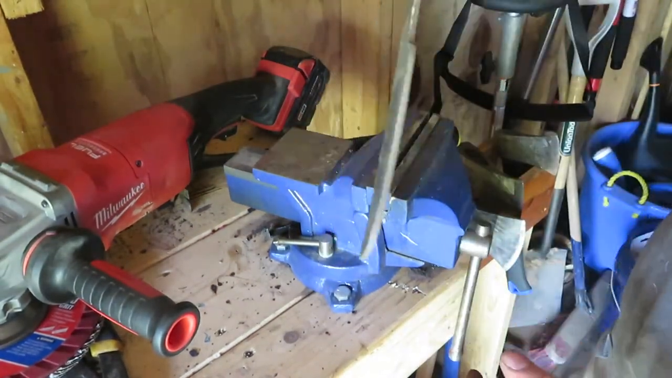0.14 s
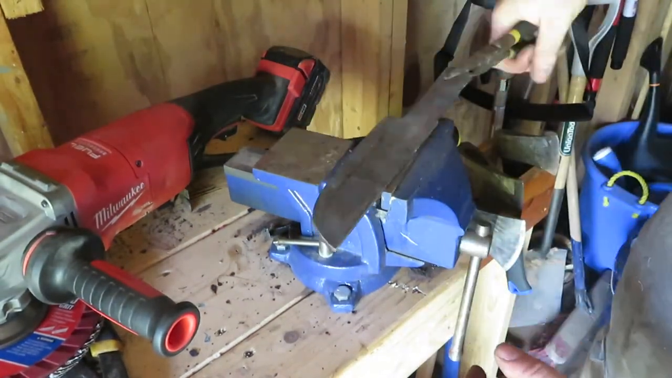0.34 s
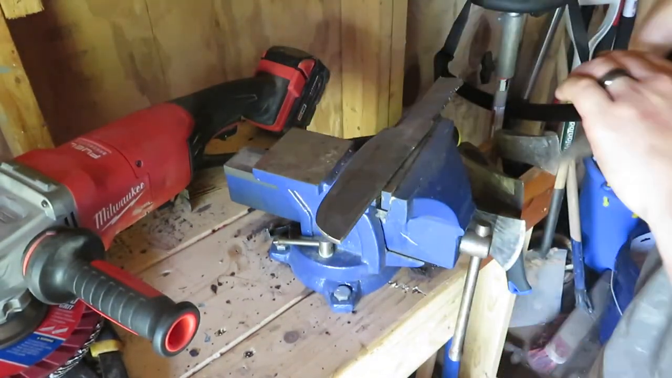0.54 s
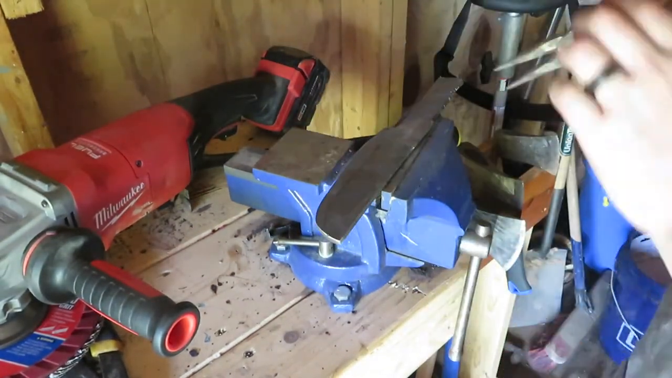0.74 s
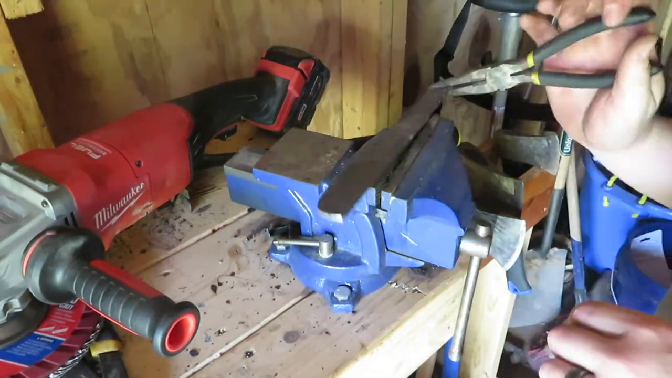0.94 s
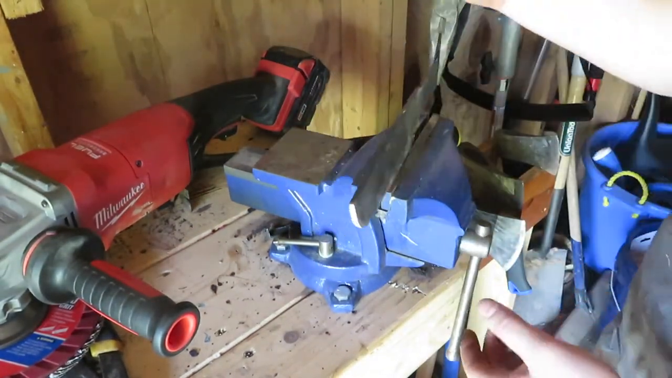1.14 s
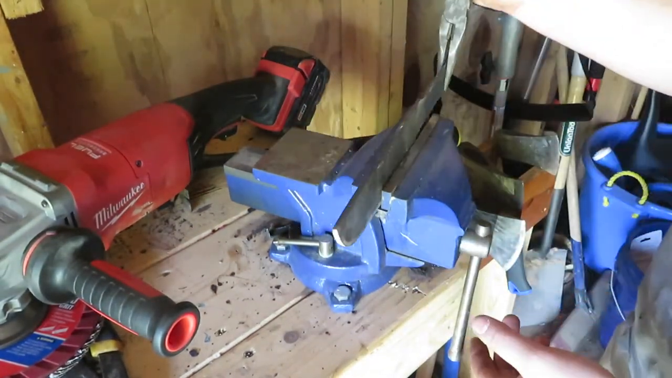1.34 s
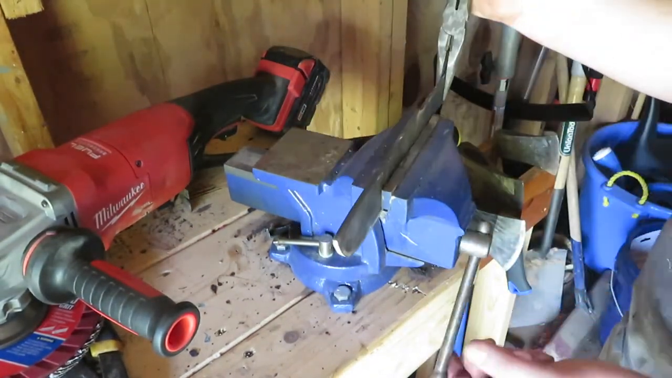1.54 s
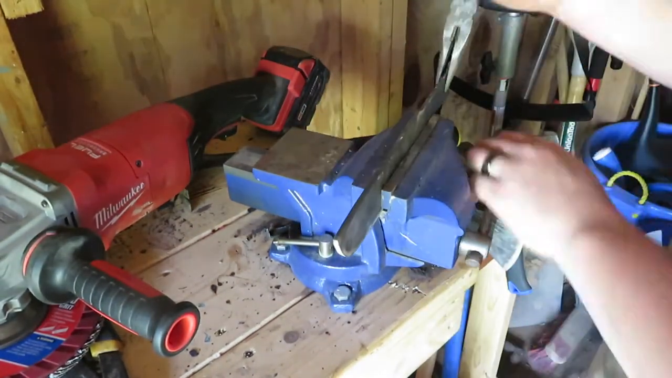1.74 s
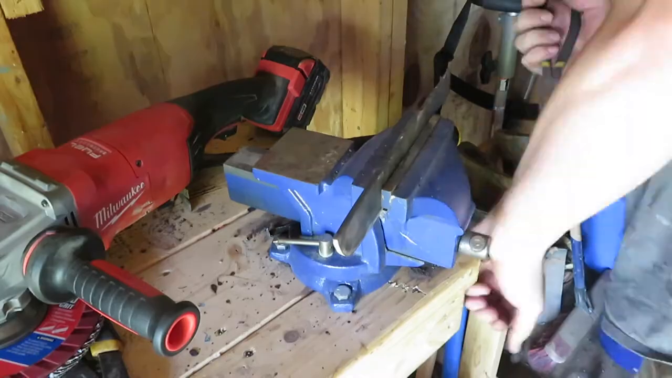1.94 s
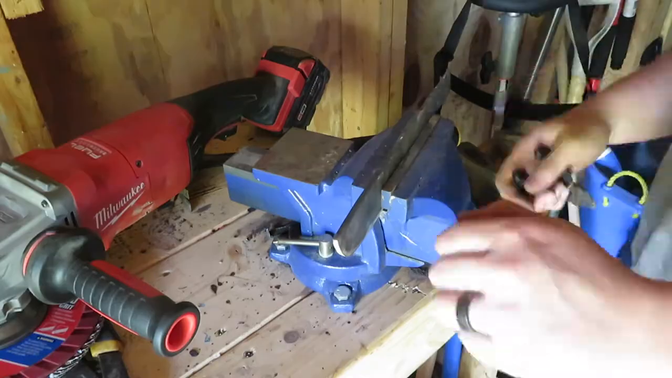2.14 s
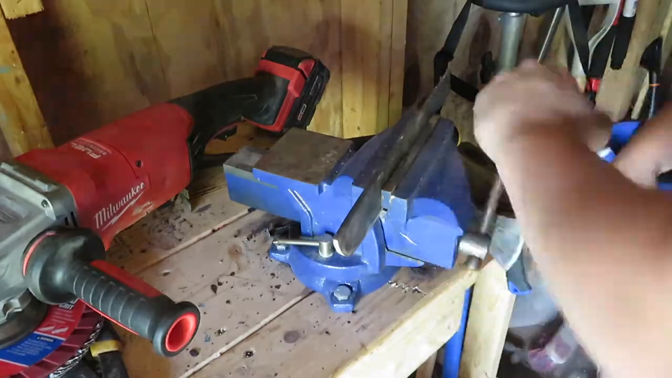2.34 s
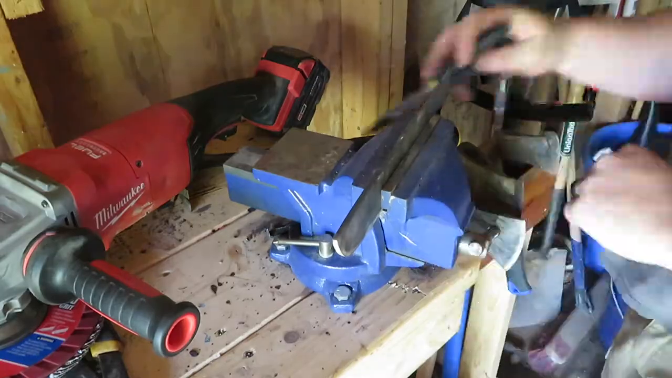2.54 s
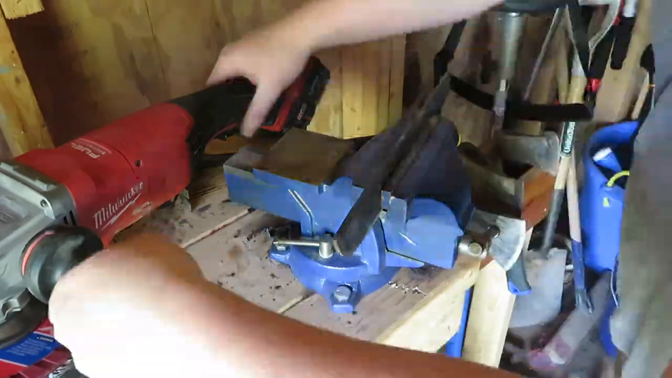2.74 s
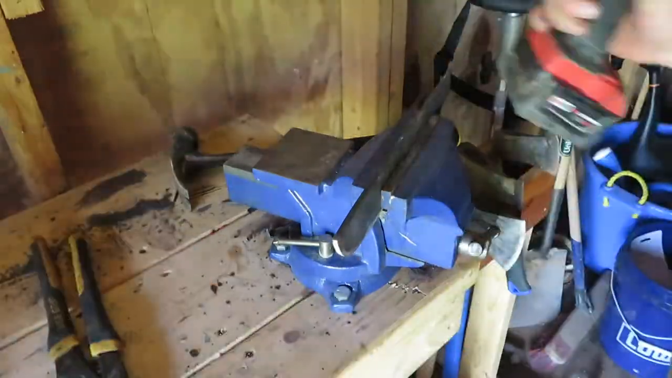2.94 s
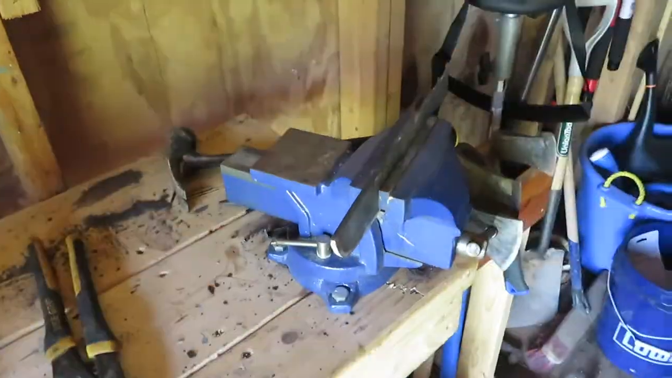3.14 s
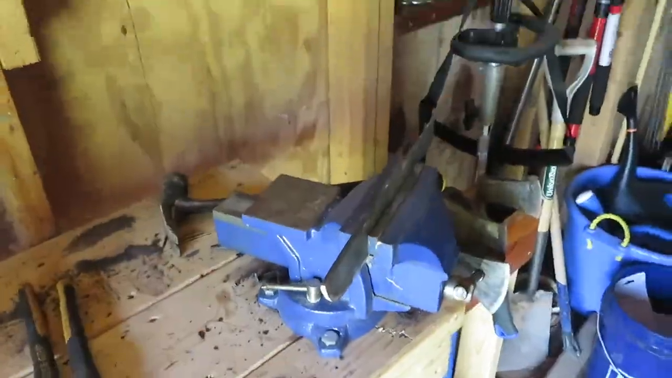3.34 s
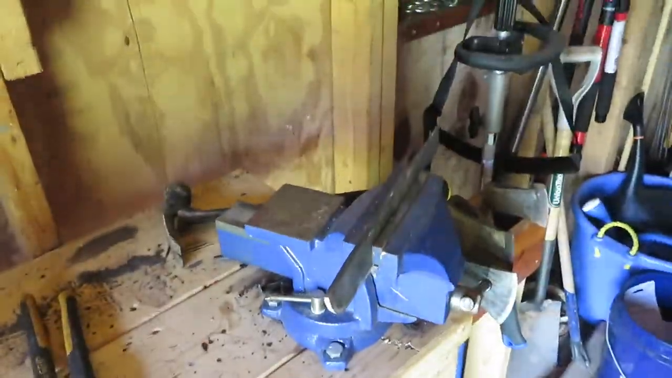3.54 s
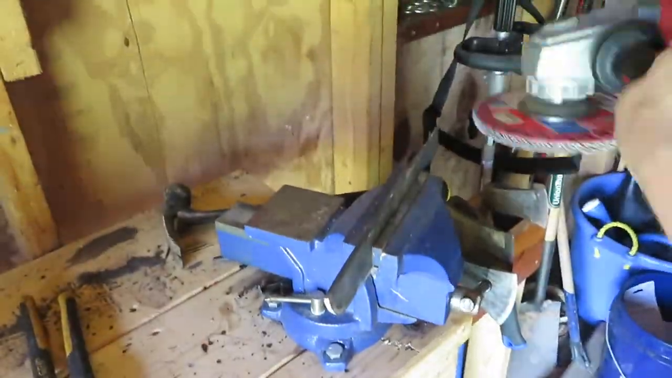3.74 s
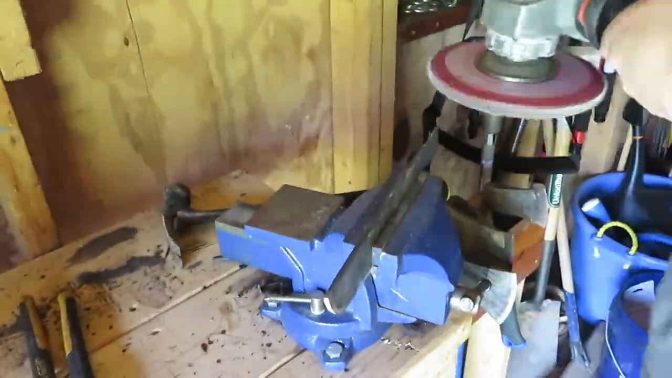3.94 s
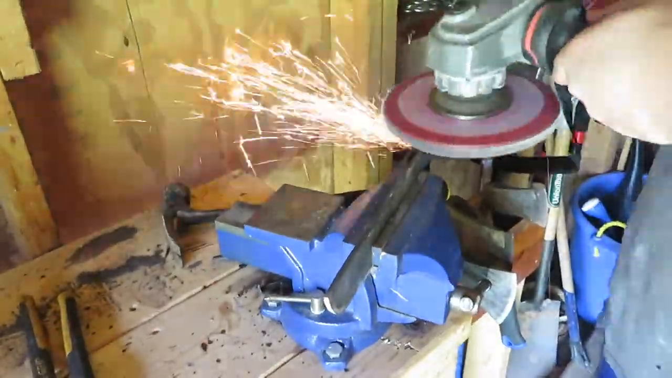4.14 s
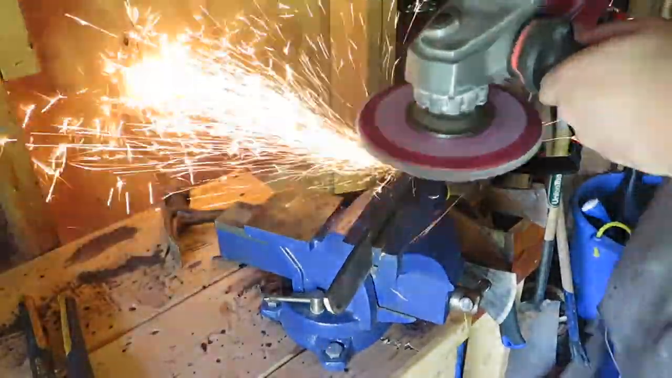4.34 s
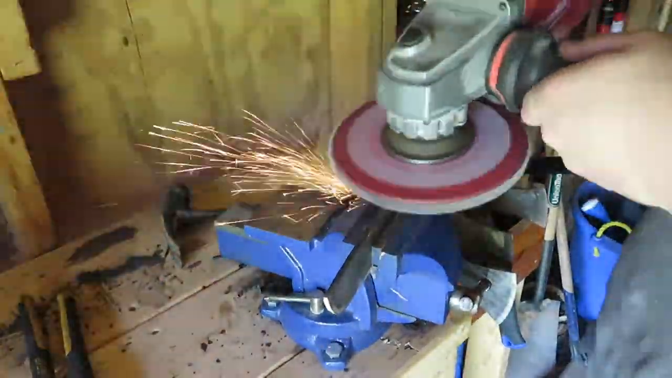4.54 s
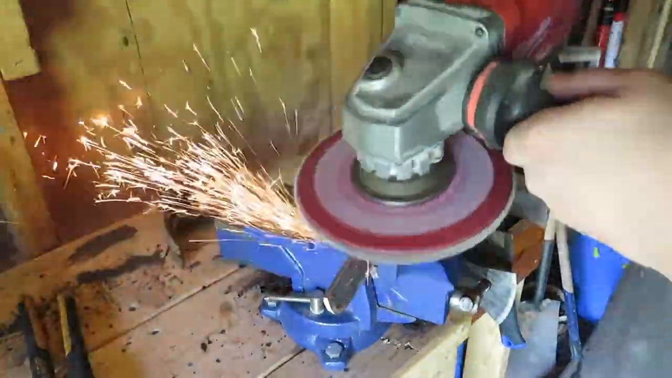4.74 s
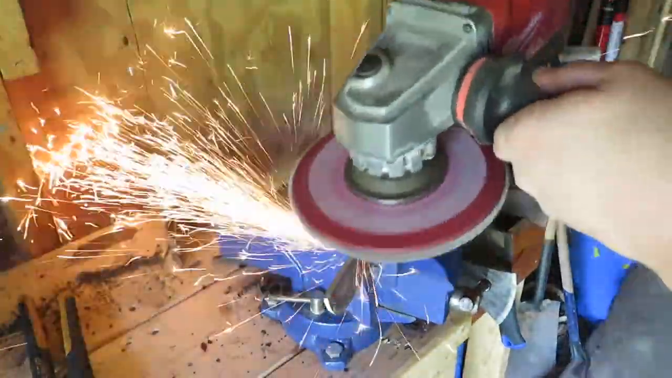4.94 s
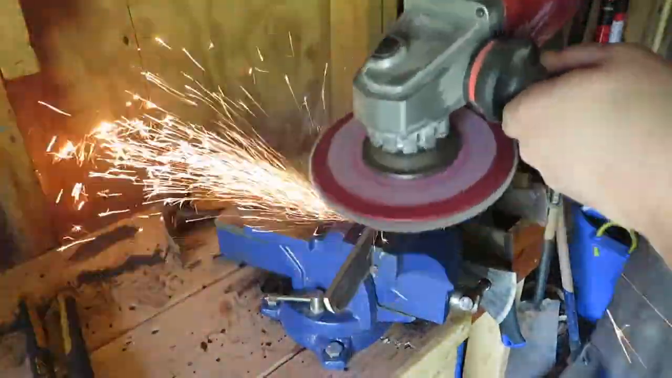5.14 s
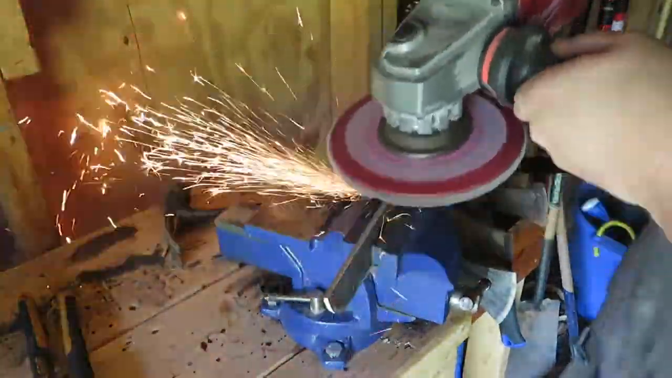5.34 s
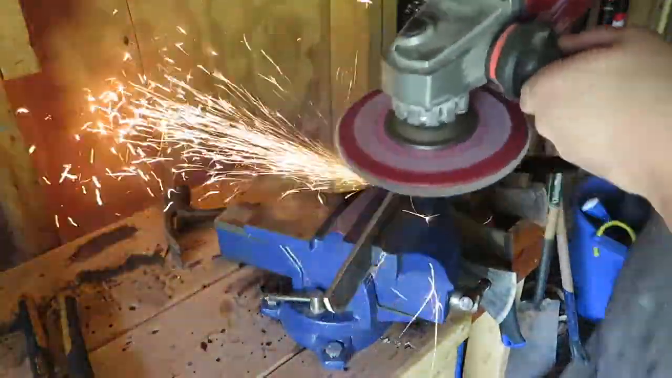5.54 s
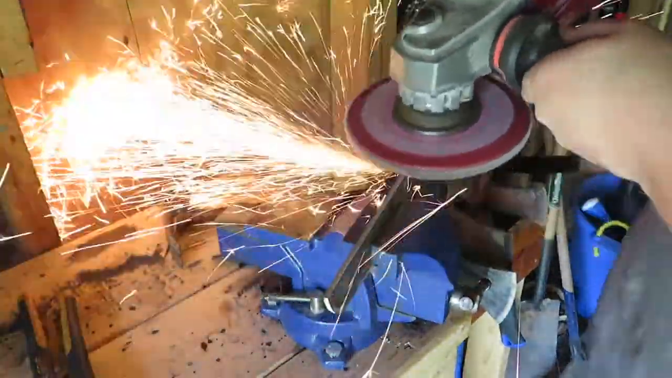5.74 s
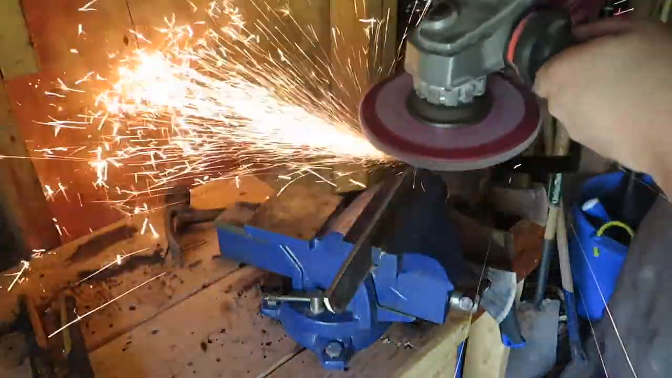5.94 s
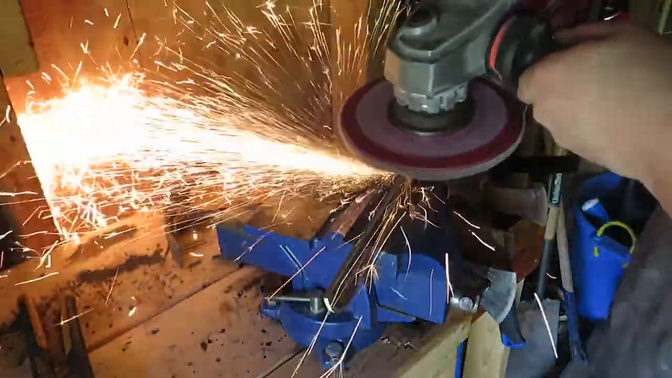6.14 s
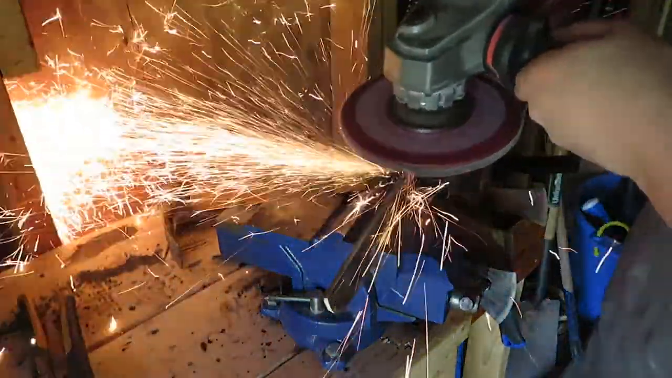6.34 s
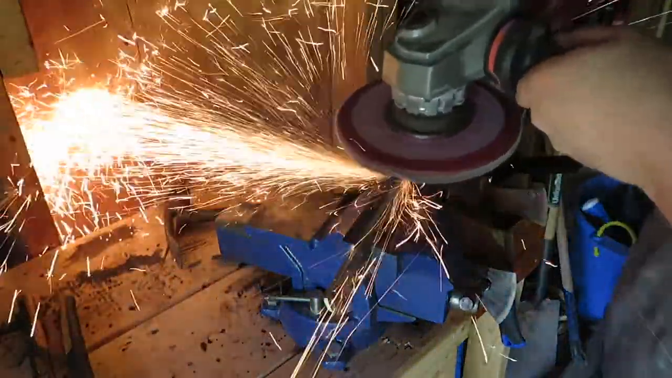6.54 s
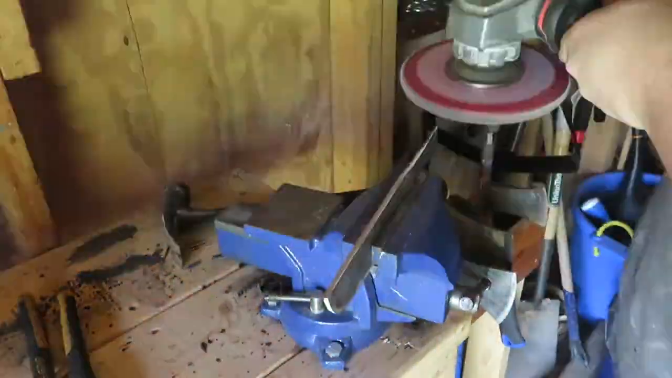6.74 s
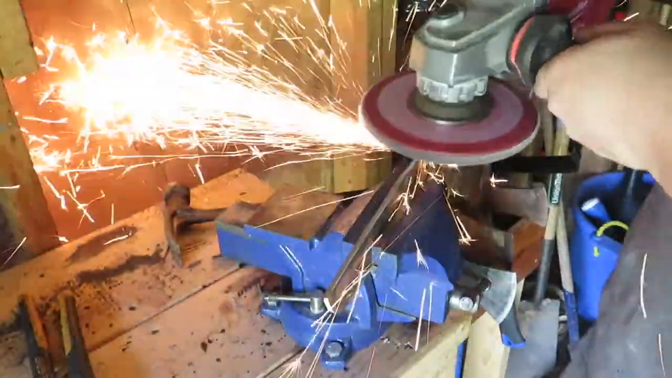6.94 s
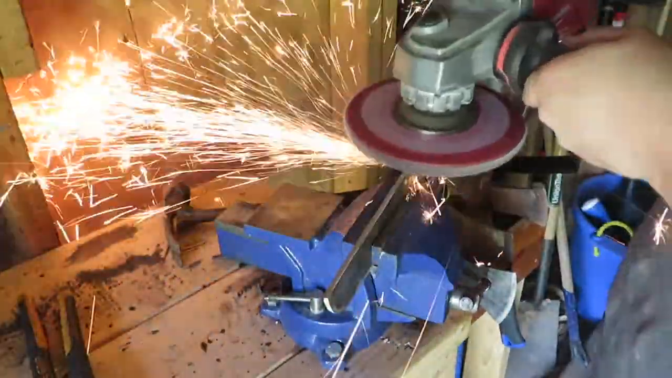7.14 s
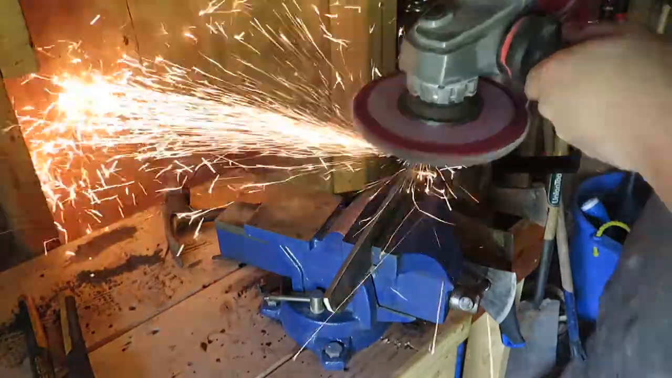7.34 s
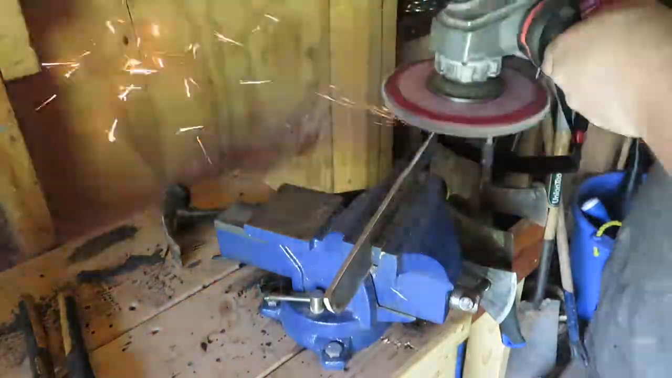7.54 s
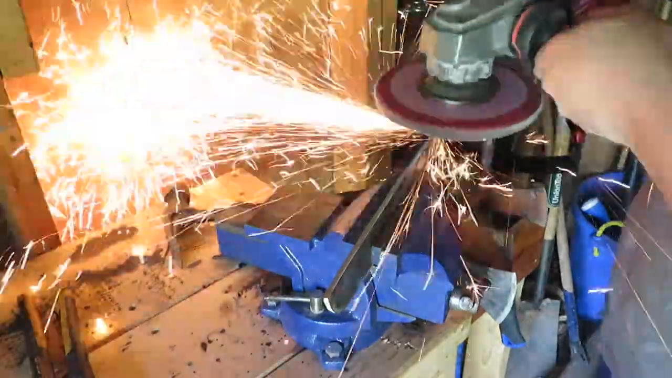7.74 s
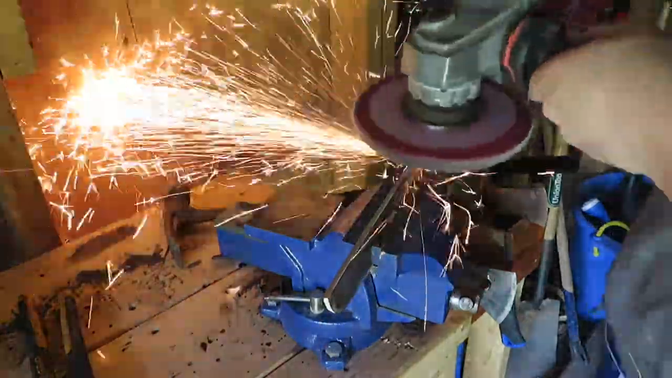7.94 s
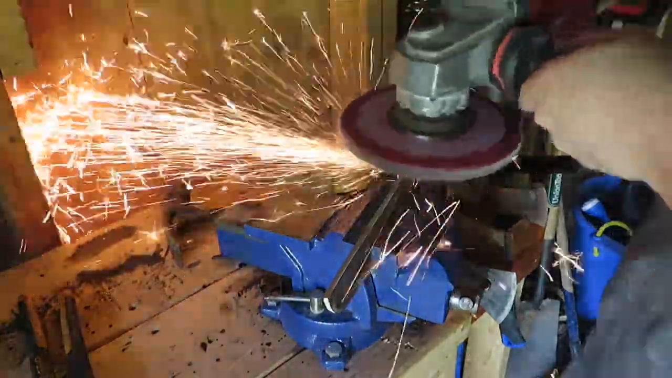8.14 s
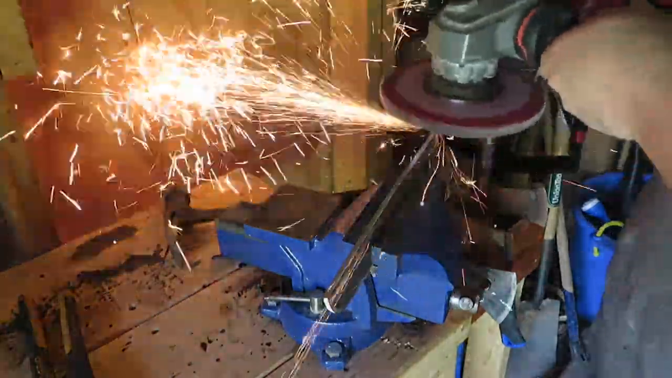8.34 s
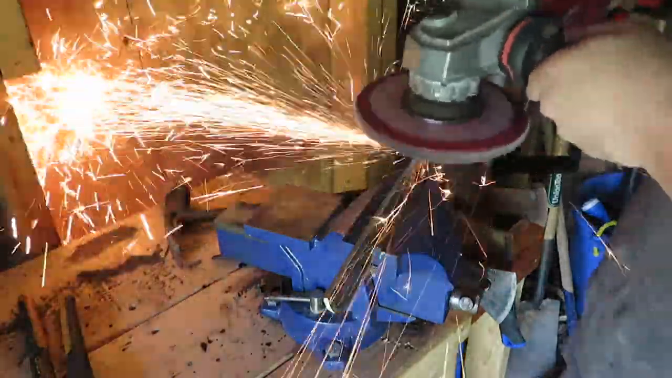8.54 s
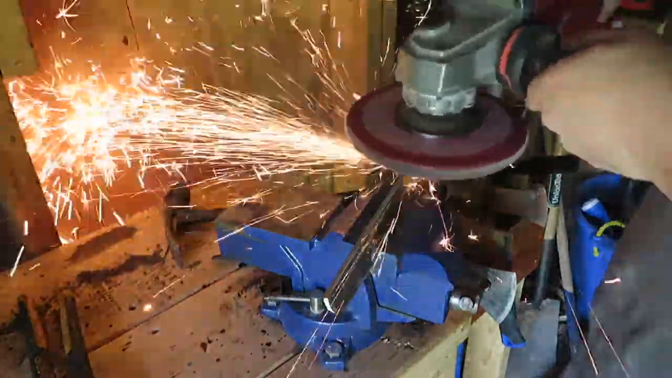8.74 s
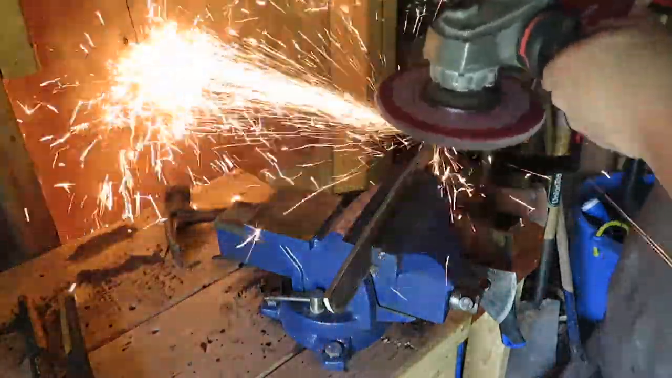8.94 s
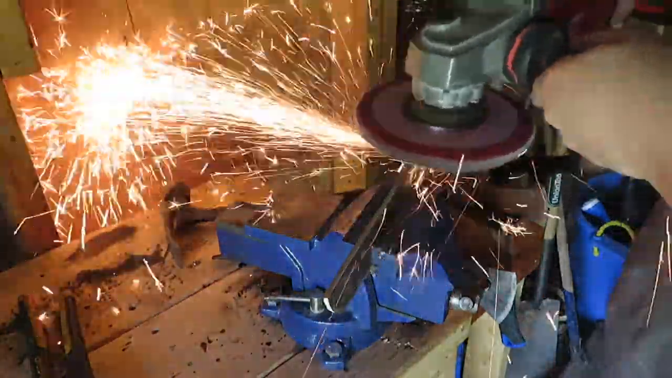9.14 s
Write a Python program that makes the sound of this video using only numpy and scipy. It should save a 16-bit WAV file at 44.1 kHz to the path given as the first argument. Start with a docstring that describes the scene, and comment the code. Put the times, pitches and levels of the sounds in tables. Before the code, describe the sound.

Quiet metal clicks, scrapes and hard clanks at a bench, then a cordless grinder rattles to life and grinds a clamped blade, whining between passes.

```python
"""A small wooden workshop, with room air and a distant fan: tonal hum over coloured noise, sinking at start-up.
Close by, pliers tick, a vise handle clanks and steel slides: noise bursts, ringing modes, a swish of sleeve.
A cordless angle grinder then starts with a rattle: clattering noise and gear tones that sweep upward.
It is leaned on a clamped steel blade in four passes, slowing under load and whining up at each lift: a comb
of lines repeating once per wheel turn, with scattered noise, rasps, squeals and sets the steel ringing."""
import sys
import numpy as np
from scipy import signal
from scipy.fft import rfft, irfft, next_fast_len
from scipy.io import wavfile
from scipy.ndimage import uniform_filter1d

SR = 44100
rng = np.random.default_rng(int(sys.argv[2]) if len(sys.argv) > 2 else 0)


def store_pcm(level_fs):
    """Save levels as 16-bit WAV."""
    pcm = np.round(np.clip(level_fs, -1, 1) * 32767).astype(np.int16)
    wavfile.write(sys.argv[1], SR, np.atleast_2d(pcm).T)


N = 405279
TIME = np.arange(N) / SR
CUTOFF_HZ = 15950
GEAR_RATIO = 44 / 15   # motor turns per wheel turn
FREE_TURNS_PER_S = 372.2   # wheel speed off the steel
BITE_S, TOUCH_S = 0.105, 0.024   # full pressure builds; the rasp sets in
# wheel leaned on the blade: touch [t/s], lift [t/s], rasp effort [level/dB], fade [dB per s],
# blade ring [level/dB]
PASSES = [(4.088, 4.437, 5.5, 36.5, -47), (4.511, 6.643, -1.1, 0, -48), (6.79, 7.423, -1.5, 3, -39.5),
          (7.533, 9.299, -1.5, -1, -38)]


def from_db(db):
    """Decibels to gain."""
    return 10 ** (np.asarray(db) / 20)


def rms_one(x):
    """Scale to rms 1."""
    return x / np.sqrt(np.mean(x ** 2) + 1e-20)


def in_time(rows):
    """One curve over time per column of a table."""
    s, *columns = np.transpose(rows)
    return [np.interp(TIME, s, c) for c in columns]


def drift(rate):
    """Slow chance with spread 1, from random points at a rate per second."""
    points = rng.standard_normal(int(N / SR * rate) + 2)
    return rms_one(np.interp(TIME * rate, np.arange(len(points)), points))


def ramp(start_s, length_s):
    """Rises from 0 to 1."""
    return np.clip((TIME - start_s) / length_s, 0, 1)


def during(from_s, to_s, ease_s=0.012):
    """1 between two moments, with soft edges."""
    return ramp(from_s, ease_s) * (1 - ramp(to_s - ease_s, ease_s))


def swell(s, half_length_s, db):
    """A bell-shaped gain."""
    return from_db(db) * np.exp(-.5 * ((TIME - s) / half_length_s) ** 2)


def band(x, low_hz, high_hz):
    """Causal band-pass."""
    edges = [low_hz, min(high_hz, .47 * SR)]
    return signal.sosfilt(signal.butter(2, edges, "band", fs=SR, output="sos"), x + 1e-18)


def colour(x, spectrum, keep_power=True):
    """Give a sound the spectrum of a table of f/Hz and level/dB."""
    size = next_fast_len(N, True)
    hz, db = np.transpose(spectrum)
    bins = np.maximum(np.fft.rfftfreq(size, 1 / SR), 1)
    gain = from_db(np.interp(np.log(bins), np.log(hz), db))
    if keep_power:
        gain = rms_one(gain)
    return irfft(rfft(x, size) * gain, size)[:N]


def ring(x, hz, t60):
    """A resonator: a unit click sets a sine of height 1 ringing, 60 dB down after t60 seconds."""
    r = from_db(-60 / (t60 * SR))
    w = 2 * np.pi * hz / SR
    return signal.lfilter([0, np.sin(w)], [1, -2 * r * np.cos(w), r * r], x + 1e-18)


def level(x, size=4000):
    """Running rms."""
    return np.sqrt(np.abs(uniform_filter1d(x ** 2, size)) + 1e-12)


def place(x, pan_db, width):
    """A lean to one side above 500 Hz, and a 6 ms reflection with opposite sign at the two microphones."""
    echo = colour(np.pad(x, (SR // 170, 0))[:N], width, keep_power=False)
    side = echo + (from_db(pan_db / 2) - 1) * band(x, 500, 20000)
    return x + side * [[1], [-1]]


def background(air_db=-47.5, duck_db=-14.5):
    """Coloured noise for the room air and wavering sines for a distant fan; both sink as the grinder starts."""
    # room air: f/Hz, relative level/dB
    air_colour = [(40, -21), (75, -22), (140, -5.5), (240, -6), (380, -2), (520, -6), (900, -12),
                  (1200, -8), (2000, -15), (5000, -22), (15500, -30)]
    # distant fan: f/Hz, level before sinking/dB
    fan_tones = [(240, -62.5), (386.3, -53.5), (415.5, -57), (1110, -62.5)]
    hum = np.zeros(N)
    for hz, db in fan_tones:
        tone = np.sin(2 * np.pi * hz * TIME + 0.19 * drift(5.06))
        hum += np.sqrt(2) * from_db(db + 0.62 * drift(4.12)) * tone
    air = from_db(air_db) * colour(rng.standard_normal(N), air_colour)
    sink_db = duck_db * ramp(3.92, 0.043)
    dip_db = -5 * during(2.14, 2.4, ease_s=0.042)   # the room level dips briefly
    return (air + hum) * from_db(sink_db + dip_db)


def sleeve():
    """A faint, high swish of cloth: band-passed noise under a bell."""
    return swell(3.55, 0.045, -52) * rms_one(band(rng.standard_normal(N), 11000, 14200))


def slides(grain_db=2.5):
    """Steel slides on steel and wood: short strokes of noise whose level flickers like grit."""
    # strokes: start t/s, length/s, level/dB, bright over dull/dB
    strokes = [(0.91, 0.042, -38.5, -8), (1.252, 0.14, -49, -13), (1.765, 0.079, -44, -3),
               (2.092, 0.06, -30.5, 3), (2.363, 0.034, -47.5, 2), (2.544, 0.033, -45.5, 3),
               (2.806, 0.12, -44.5, -3), (2.842, 0.019, -43.5, 3), (2.984, 0.062, -45, -7),
               (3.598, 0.32, -48, -7.5)]
    rub = rng.standard_normal(N) * from_db(grain_db * drift(440))
    dull, bright = band(rub, 680, 3900), band(rub, 2430, 10200)
    out = np.zeros(N)
    for s, length, db, bright_db in strokes:
        stroke = np.sqrt(np.abs(np.sin(np.pi * ramp(s, length))))
        out += from_db(db) * stroke * rms_one(dull + from_db(bright_db) * bright)
    return out


def blow(low_hz, high_hz, crack_t60, tail_t60, tail_db):
    """A short crack and the workshop's tail in one band, with rms 1 over its first 10 ms."""
    t = TIME[:SR // 2]
    shape = from_db(-60 * t / crack_t60) + from_db(tail_db - 60 * t / tail_t60)
    hit = band(rng.standard_normal(len(t)) * shape, low_hz, high_hz)
    return hit / np.sqrt(np.mean(hit[:SR // 100] ** 2))


def taps(bench_db=-27.0, thud_db=0.0, clank_db=-5.0, tick_db=-7.0, modes_db=-7.0):
    """Each blow thuds through the bench, clanks in the vise and ticks at the contact; the modes ring on."""
    # tools, vise handle and trigger: t/s, strength before trims/dB, hardness (tick over clank before trims)/dB
    blows = [(0.309, -36.5, 3), (0.382, -41, 3), (0.394, -31, 3), (0.910, -33, -0.5), (0.931, -39, -5),
             (0.953, -33.5, -13), (1.009, -41.5, -25), (1.161, -31, -6), (1.252, -43.5, -15),
             (1.426, -34, -4.5), (1.67, -38, -5), (1.900, -14.5, -2.5), (2.11, -34, 7), (2.132, -13, 0.5),
             (2.494, -32, -5), (2.545, -42, -13), (2.620, -14.5, -12.5), (2.636, -12.5, -7.5),
             (2.773, -44, 5), (2.786, -40, 3), (2.965, -41, -29), (3.008, -49, 10), (3.098, -36, -3),
             (3.165, -41, -4), (3.338, -34.5, -10), (3.82, -48, -16), (3.881, -33.5, 15), (3.893, -33, 11)]
    # vise and blade: f/Hz, relative level/dB, t60/s
    vise_modes = [(329, -8, 0.24), (556, 6.5, 0.11), (1240, 4.5, 0.037), (1780, -4.5, 0.096),
                  (2520, -24, 0.11), (2750, -4, 0.036), (2890, -6, 0.055), (3170, -1.5, 0.032),
                  (3660, -10, 0.034), (5340, -12, 0.12), (6560, -8.5, 0.064), (7650, -4, 0.038)]
    # loose parts and bench boards that ring when touched: t/s, f/Hz, level before a band-pass/dB, t60/s
    loose_parts = [(0.393, 497, -37, 0.12), (0.394, 7540, -33, 0.061), (0.393, 12250, -46, 0.3),
                   (0.911, 2930, -36, 0.1), (1.161, 1310, -19, 0.061), (1.427, 1000, -31, 0.065),
                   (1.745, 3020, -36, 0.06), (1.9, 137, -30, 0.17), (1.899, 257, -21.5, 0.06),
                   (1.899, 348, -19, 0.084), (1.9, 3020, -13, 0.028), (1.899, 3700, -17, 0.05),
                   (2.132, 1010, -16, 0.049), (2.131, 2360, -16, 0.041), (2.132, 5340, -19, 0.056),
                   (2.132, 5500, -51, 0.3), (2.621, 1783, -14, 0.07), (2.619, 3010, -15, 0.088),
                   (2.620, 7150, -16.5, 0.032), (2.635, 3220, -9.5, 0.07), (3.167, 340, -25.5, .08),
                   (3.338, 1650, -31, 0.05), (3.893, 3100, -18, 0.075), (3.904, 542, -28.5, 0.05),
                   (3.916, 3140, -15.5, 0.071)]
    at = [round(row[0] * SR) for row in blows]
    _, strength, hardness = np.transpose(blows)
    # a hard blow thuds less
    thuds = bench_db + 0.53 * strength - 0.51 * hardness
    levels = np.transpose([thuds, strength, strength + hardness])
    out = np.zeros(N)
    for i, (thud, clank, tick) in zip(at, levels):
        hit = from_db(thud + thud_db) * blow(303, 730, crack_t60=0.12, tail_t60=0.15, tail_db=10)
        hit += from_db(clank + clank_db) * blow(820, 3880, crack_t60=0.014, tail_t60=0.11, tail_db=10.0)
        hit += from_db(tick + tick_db) * blow(2700, 12200, crack_t60=0.0078, tail_t60=0.091, tail_db=-12)
        out[i:i + len(hit)] += hit
    for hz, db, t60 in vise_modes:
        clicks = np.zeros(N)
        column = np.searchsorted([700, 4000], hz)   # driven by thud, clank or tick
        # each blow lands elsewhere and favours other modes
        favour_db = rng.uniform(-5, 5, len(at))
        sign = rng.choice([-1, 1], len(at))
        clicks[at] = from_db(levels[:, column] + db + modes_db + favour_db) * sign
        out += band(ring(clicks, hz, t60), hz / 2, hz * 2)
    for s, hz, db, t60 in loose_parts:
        click = signal.unit_impulse(N, round(s * SR))
        out += from_db(db) * band(ring(click, hz, t60), hz / 2, hz * 2)
    return out


def contact(attack_s):
    """1 while the wheel is on the steel, 0 while it is lifted."""
    leave_s = 0.01
    return sum(ramp(touch, attack_s) * (1 - ramp(lift - leave_s, leave_s)) for touch, lift, *_ in PASSES)


def hand_drag(ease_s=0.0495):
    """The hand's pressure, as the speed it costs; in the long pass the hand rocks to and fro."""
    # pressure of the hand before rocking: t/s, speed lost/turns per s
    pressure = [(4.094, 19.8), (4.583, 67.7), (4.702, 47.7), (4.867, 62), (5.218, 70.4), (6.001, 61.3),
                (6.184, 80), (6.592, 93.2), (6.922, 54.4), (7.183, 65), (7.218, 75.4), (7.644, 65),
                (8.107, 74), (8.14, 53.9), (8.262, 80), (8.326, 30), (8.442, 64.6), (8.541, 50.3),
                (8.906, 77), (9.19, 63.5)]
    rock_from_s, rock_to_s = 4.862, 5.952
    rocks_per_s, rock_depth = 4.881, 7.63   # depth in turns per s
    rocking = during(rock_from_s, rock_to_s, ease_s)
    rock = np.sin(2 * np.pi * rocks_per_s * (TIME - rock_from_s))
    return in_time(pressure)[0] + rock_depth * rocking * rock


def wheel_speed(drag, knee=5.0):
    """Turns per second: an even run-up that levels off, less the drag of the steel, lagged by inertia."""
    start_s, soft_start_s, inertia_s = 3.897, 0.118, 0.052
    run_up = np.maximum(TIME - start_s, 0) / soft_start_s
    free = FREE_TURNS_PER_S * run_up / (1 + run_up ** knee) ** (1 / knee)
    keep = np.exp(-1 / (inertia_s * SR))
    return free - signal.lfilter([1 - keep], [1, -keep], contact(BITE_S) * drag)


def spin_up(turns, mesh_db=-5.0, growl_db=-13.0, rattle_db=2.0):
    """Gear teeth clatter in the housing while their meshing tone and the motor's growl sweep upward."""
    # gearbox housing: f/Hz, relative level/dB
    housing_colour = [(200, -47), (420, -32), (900, -27), (1400, -13.5), (2700, -10), (3100, -9),
                      (3600, -14.5), (6200, -15.5), (8300, 3), (9600, -10), (15500, -22)]
    fall_db = 1502 * np.clip(TIME - 4.014, 0, .1)   # 1502 dB per s
    envelope = ramp(3.893, 0.0078) * from_db(-17 - fall_db)
    clatter = colour(rng.standard_normal(N) * from_db(rattle_db * drift(700)), housing_colour)
    mesh = np.sin(2 * np.pi * 44 * turns + .6 * drift(900))
    growl = np.sin(2 * np.pi * 4 * GEAR_RATIO * turns + .55 * drift(500))
    tones = (from_db(mesh_db) * mesh + from_db(growl_db) * growl) * ramp(3.925, 0.016)
    return envelope * (rms_one(clatter) + tones)


def motor(speed, turns, flutter=0.0024, rough=0.11, whine_waver_db=3.5, octave_below_db=-48.0):
    """A slightly rough whine eight times a motor turn, weaker as load slows it, with a faint octave below."""
    # the whine swells as the motor speeds up or slows around the lifts: t/s, bell half length/s, level/dB
    whine_swells = [(4.029, 0.018, -10.5), (4.27, 0.028, -14), (4.34, 0.02, -20), (4.39, 0.02, -31),
                    (4.452, 0.01, -16), (6.7, 0.015, -21), (6.872, 0.022, -16.5), (7.46, 0.011, -16.5),
                    (7.53, 0.03, -22), (7.615, 0.016, -16)]
    free_db, db_per_turn = -26, 0.17   # before swells: running free; lost per turn/s of slowing
    angle = 2 * np.pi * (GEAR_RATIO * turns + flutter * drift(65))
    steady = from_db(free_db - db_per_turn * (FREE_TURNS_PER_S - speed))
    whine = steady + sum(swell(*row) for row in whine_swells)
    main = whine * np.sin(8 * angle + rough * drift(900))
    below = from_db(octave_below_db) * np.sin(4 * angle)
    flicker = from_db(whine_waver_db * np.tanh(drift(140)))
    return np.sqrt(2) * flicker * (main + below) * ramp(3.985, 0.055)


def response(hz, resonance):
    """Gain of a tone as it sweeps through a resonance."""
    centre_hz, width_hz, top_db = resonance
    return from_db(top_db) / np.hypot(1, (hz - centre_hz) / width_hz)


def imbalance(speed, turns, waver_db=3.5, once_edge_db=-11.5, twice_edge_db=-12.0, hum_db=-55.5):
    """The lopsided wheel hums once a turn and, on the steel, knocks raggedly twice; both weaker early on."""
    # resonances: centre Hz, width Hz, top dB before waver and edge loss
    once_a_turn, twice_a_turn = (357.5, 10.2, -39.5), (589, 39, -44)
    bite = contact(BITE_S)
    angle = 2 * np.pi * (turns + .035 * bite * drift(70))
    # on the blade's edge both are weaker
    on_edge = ramp(4.32, 0.37) * (1 - ramp(4.83, 0.74))
    once_gain = contact(TOUCH_S) * response(speed, once_a_turn) + from_db(hum_db)
    once = once_gain * from_db(once_edge_db * on_edge + waver_db * drift(24)) * np.sin(angle)
    twice_db = twice_edge_db * (1 - ramp(4.96, 1.64)) + waver_db * drift(60)
    twice = bite * response(2 * speed, twice_a_turn) * from_db(twice_db) * np.sin(2 * angle)
    dip = from_db(-10 * during(8.31, 8.44))   # the hand eases and the wheel's hum dips
    return np.sqrt(2) * (once + twice) * ramp(3.98, 0.039) * dip


def squeals(turns):
    """The blade catches and sings with one line of the grit: rough tones that follow the wheel and fade."""
    # squeals: t/s, bell half length/s, cycles per wheel turn, level before flicker/dB
    catches = [(4.753, 0.19, 11, -38.5), (6.416, 0.25, 11, -36.5), (4.798, 0.098, 5, -38),
               (4.855, 0.028, 21, -23.5), (5.298, 0.41, 21, -38), (6.396, 0.17, 55, -22),
               (6.611, 0.024, 55, -19), (6.897, 0.019, 9, -30.5), (7.643, 0.017, 9, -26),
               (7.746, 0.014, 11, -30), (7.802, 0.019, 10, -25), (8.165, 0.025, 10, -36),
               (8.257, 0.02, 10, -20.5), (8.42, 0.032, 9, -29), (8.529, 0.049, 26, -18.5),
               (8.632, 0.021, 9, -30), (8.923, 0.036, 10, -30.5), (9.017, 0.041, 10, -25.5)]
    slip = 0.28 * drift(300)
    flicker = from_db(4.0 * (np.tanh(drift(80)) - .5))
    tones = np.zeros(N)
    for s, half_length, k, db in catches:
        tones += swell(s, half_length, db) * np.sin(2 * np.pi * round(k) * turns + slip)
    return np.sqrt(2) * flicker * tones


def grit(turns, places, wear_db=3.5):
    """The same grains pass on every turn and make a comb of lines that change as the wheel wears."""
    # lobes that stand out, one list per place on the blade: cycles per wheel turn, extra level/dB
    wheel_lobes = [
        [(3, -6), (5, 6), (6, 2), (11, 6.5), (12, 3.5), (15, 5), (18, 4), (21, 9.5), (26, 0.5), (27, 3.5)],
        [(3, -5), (4, 2), (5, 2), (11, 3), (12, 6), (26, 9), (27, 6.5), (28, 6)],
        [(3, -7), (5, 5), (10, 0.5), (11, 3), (26, 4.5), (27, 3.5), (44, 6)],
    ]
    angle = 2 * np.pi * (turns + .002 * drift(150))
    comb = np.zeros(N)
    for k in np.arange(3, CUTOFF_HZ // 280):
        lobe_db = 0
        for share, lobes in zip(places, wheel_lobes):
            lobe_db = lobe_db + share * sum(db for order, db in lobes if round(order) == k)
        phase = ((k * angle + rng.uniform(0, 2 * np.pi)) % (2 * np.pi)).astype(np.float32)
        comb += from_db(lobe_db + wear_db * drift(26)) * np.sin(phase)
    return rms_one(comb)


def reflections(x, echo_db=-1.5, count=14):
    """Bench, walls and housing answer within 12 ms; a gliding line swells and fades in their comb."""
    lags = (rng.uniform(.0005, .012, count) * SR).astype(int)
    signs = rng.choice([-1, 1], count)
    echoes = sum(sign * np.pad(x, (lag, 0))[:N] for lag, sign in zip(lags, signs))
    return x + from_db(echo_db) / np.sqrt(count) * echoes


def rasp_levels(drag, speed):
    """Body, hiss and blade ring in dB: set by each pass, raised by pressure, falling away off the steel."""
    usual_drag = 62.5   # turns per s
    # dB at usual drag before the pass's effort, dB per turn/s of further drag, dB lost off the steel
    body_law, hiss_law = (-31, 0.076, 2.5), (-21.5, 0.065, 5.5)
    touch, _, db, fade, ring_db = np.transpose(PASSES)
    now = np.maximum(np.searchsorted(touch, TIME) - 1, 0)
    on = uniform_filter1d(contact(TOUCH_S), size=1000)
    effort = db[now] - fade[now] * (TIME - touch[now])
    # off the steel the rush of air grows with speed
    slack_db = 0.1 * (FREE_TURNS_PER_S - speed)
    body, hiss = [usual + on * (effort + slope * (drag - usual_drag)) - (1 - on) * (lost + slack_db)
                  for usual, slope, lost in (body_law, hiss_law)]
    # the rasp bursts as the wheel meets the steel
    grab_db = 2.5 * sum(swell(s, 0.039, 0) for s in touch)
    return body + grab_db, hiss, ring_db[now]


def grinding(drag, speed, turns, ring_db=0.0, lifted_db=-8.5, throb=0.6, split_hz=4800,
             chatter_db=9.0, unsteady_db=0.33):
    """Grit excites the blade and the wheel; breaking grains add a scatter of noise, in step with the turns."""
    # rasp at three places along the blade: f/Hz, relative level/dB
    edge_colour = [(300, -20.5), (1000, -11), (1600, -9), (3500, -11), (4700, -12.5), (5900, -9.5),
                   (6500, -6), (6850, -10), (8250, 1), (9300, -7.5), (11500, -6.5), (13400, -1.5),
                   (15500, -3.5)]
    flat_colour = [(300, -32), (1000, -19.5), (1500, -14.5), (2700, -18), (3400, -15.5), (4500, -18.5),
                   (6300, -15.5), (7600, -6.5), (9500, -10.5), (12000, -12), (14600, -7.5), (15550, -1)]
    tip_colour = [(300, -16.5), (1000, -9.5), (1550, -8), (2400, -8.5), (3400, -10), (4700, -10),
                  (6300, -7.5), (8200, -0.5), (9400, -3.5), (10700, -2.5), (12000, -7), (13300, -3),
                  (15500, -6)]
    moves_s = (6.08, 6.8)   # the wheel shifts to the next place
    skid_above, grip_span = 344, 23   # turns per s: grit skids above, cuts clear lines once slowed
    skid_db, scatter_db = -9.0, -0.7   # lines lost while skidding; noise beside the lines
    body, hiss, ringing = rasp_levels(drag, speed)
    first, second = [np.clip((TIME - s) / 0.07 + .5, 0, 1) for s in moves_s]
    places = [1 - first, first - second, second]
    # off the steel and while the grit skids, the lines give way to noise
    bite = contact(BITE_S)
    lifted = 1 - bite
    grip = contact(TOUCH_S) * np.clip((skid_above - speed) / grip_span, 0, 1)
    comb = grit(turns, places) * from_db(skid_db * (1 - grip))
    scatter = rng.standard_normal(N) * (1 + throb * np.sin(2 * np.pi * turns))
    grains = band(scatter, 1150, 14000) + .3 * scatter
    noise = .7 * grains + from_db(lifted_db) * lifted * scatter
    force = reflections(comb + from_db(scatter_db) * noise)
    colours = [edge_colour, flat_colour, tip_colour]
    rasp = sum(share * colour(force, c) for share, c in zip(places, colours))
    low = band(rasp, 82, split_hz)
    high = band(band(rasp, split_hz, 21800), 5900, 20800)
    # running levels are evened out, then follow the hand
    sound = from_db(body) * low / level(low)
    sound += from_db(hiss + 1.0 * drift(28)) * high / level(high)
    # the blade sings whenever a line crosses its resonance, and chatters against the wheel
    singing = band(ring(comb, 3065, 0.0055), 2350, 4300)
    chatter = from_db(chatter_db * np.tanh(drift(55)))
    sound += bite * from_db(ringing + ring_db) * rms_one(singing * chatter)
    return sound * from_db(unsteady_db * drift(12)) * ramp(4.0, 0.012)


def scene():
    """Bench work, then the grinder, whose speed trembles as the wheel grabs and lets go."""
    # difference between the two microphones, for bench, wheel and room: f/Hz, side over mid level/dB
    bench_width = [(60, -26), (240, -57), (950, -32), (3770, -35), (15000, -15)]
    wheel_width = [(60, -44), (240, -46), (950, -37), (3770, -50), (15000, -23.5)]
    room_width = [(60, -21), (180, -58), (550, -9.5), (1650, -7.5), (4970, -12.5), (15000, -12)]
    room = place(background(), pan_db=0.5, width=room_width)
    # the pliers land on the left of the bench
    bench_pan_db = 0.6 + 2.6 * during(2.6, 2.75)
    bench = place(taps() + slides() + sleeve(), pan_db=bench_pan_db, width=bench_width)
    drag = hand_drag()
    speed = wheel_speed(drag)
    turns = np.cumsum(speed * (1 + .0025 * drift(32))) / SR
    machine = place(motor(speed, turns) + spin_up(turns), pan_db=-0.5, width=wheel_width)
    on_blade = grinding(drag, speed, turns) + squeals(turns) + imbalance(speed, turns)
    wheel = place(on_blade, pan_db=-0.09, width=wheel_width)
    return room + bench + machine + wheel


def record(dry):
    """The highest peaks clip and the top is cut steeply."""
    low_pass = signal.firwin(901, CUTOFF_HZ, fs=SR, window=("kaiser", 9))
    return signal.fftconvolve(np.clip(dry, -1, 1), low_pass[None], "same", axes=1)


dry = scene()
out = record(dry)
store_pcm(out)
```